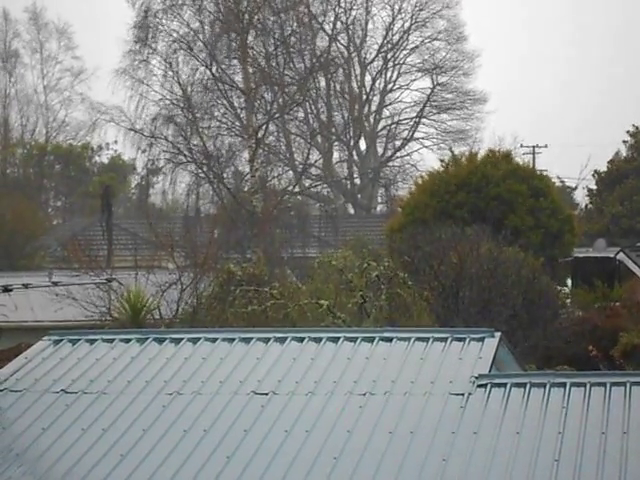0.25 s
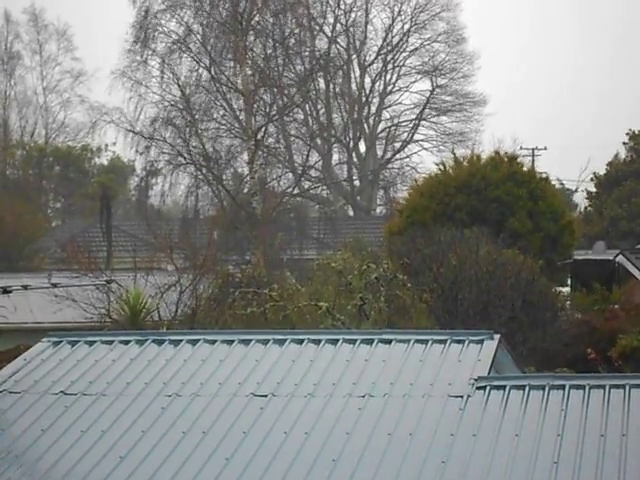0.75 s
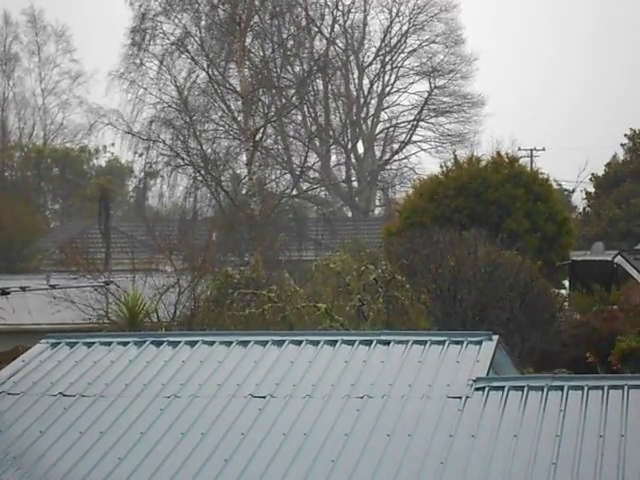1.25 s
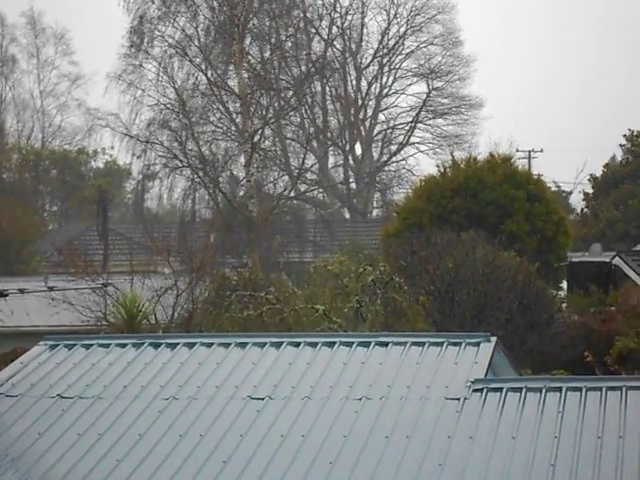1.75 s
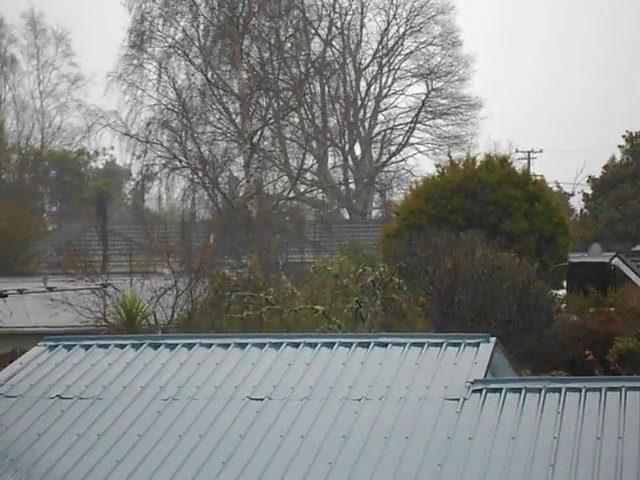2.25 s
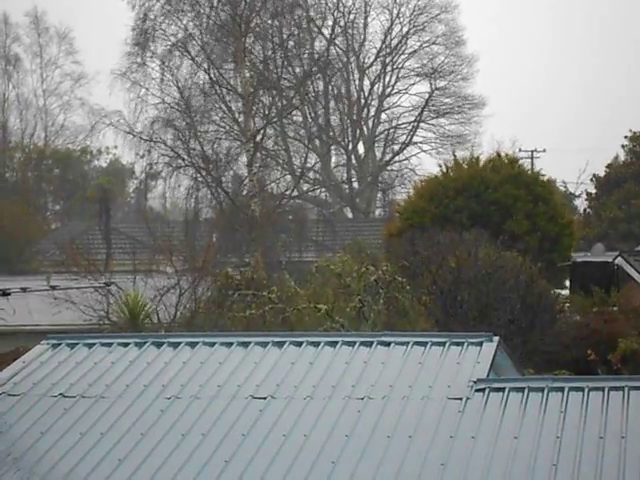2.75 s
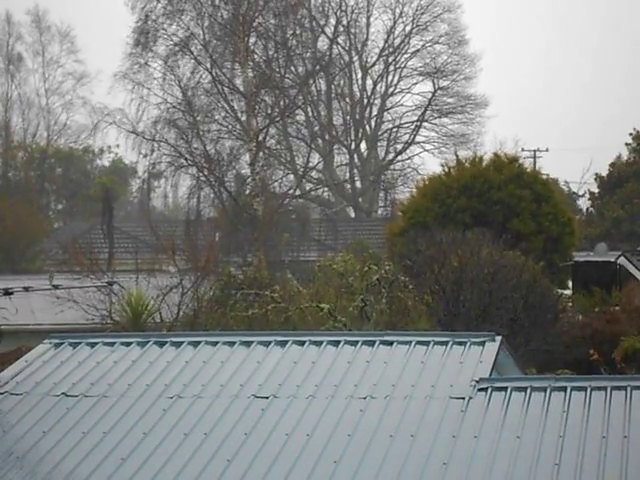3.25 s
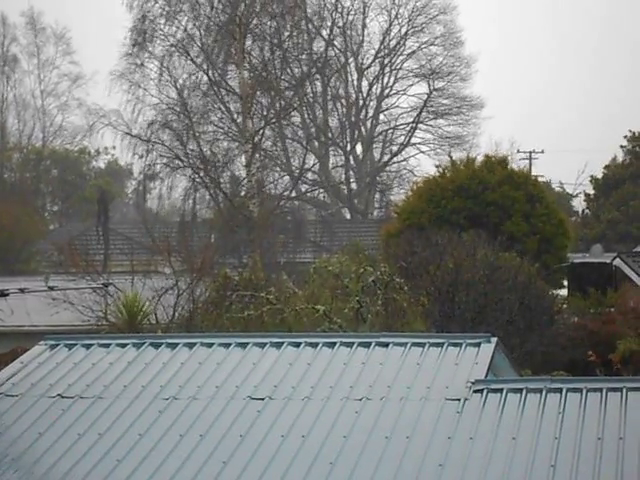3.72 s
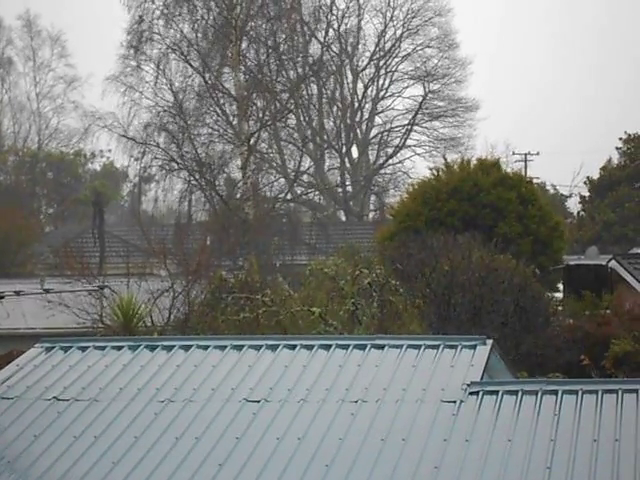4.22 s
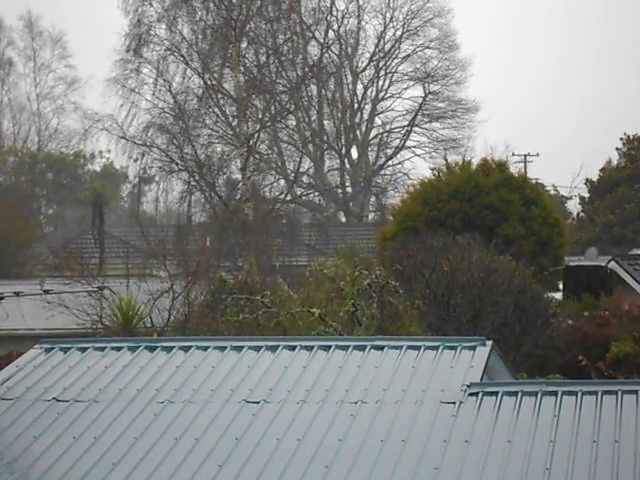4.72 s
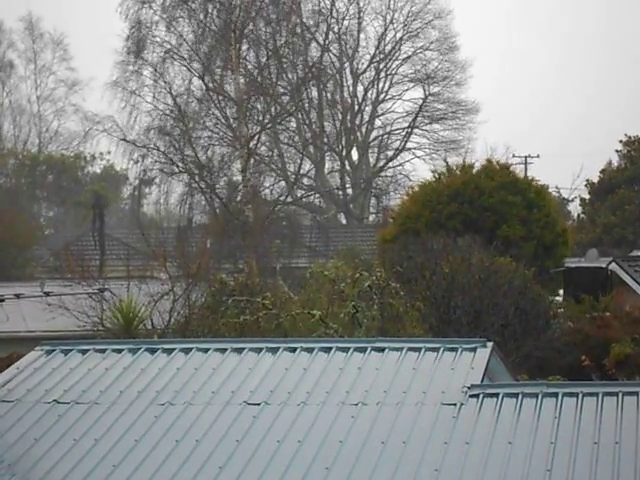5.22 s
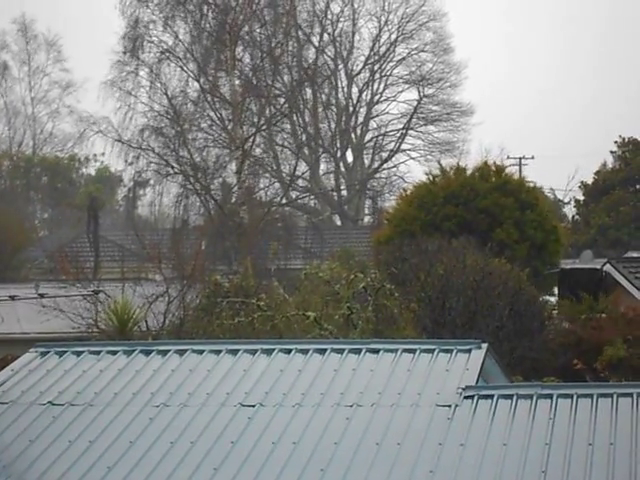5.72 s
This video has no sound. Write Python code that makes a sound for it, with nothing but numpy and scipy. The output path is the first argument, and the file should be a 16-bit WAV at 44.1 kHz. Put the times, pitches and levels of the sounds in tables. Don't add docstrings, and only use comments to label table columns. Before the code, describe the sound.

Heavy rain on corrugated metal roofs makes a continuous boomy roar under a dense bright hiss, swelling and easing slightly. Wind gusts rumble low and thump the microphone, strongest before one second, around 1.6, and from 2.5 to 3.1 seconds. Sparse nearby drops tick sharply, the loudest near 4.7. Heard from an open window through a small camera microphone whose volume dips after loud peaks.

```python
import sys
import numpy as np
from scipy import signal
from scipy.fft import rfft, irfft, next_fast_len
from scipy.io import wavfile
from scipy.ndimage import uniform_filter1d, map_coordinates

SR = 44100
rng = np.random.default_rng(int(sys.argv[2]) if len(sys.argv) > 2 else 0)


def to_wav(sig):
    pcm = np.clip(np.atleast_2d(sig), -1, 1) * 32767
    pcm = np.round(pcm).astype(np.int16)
    wavfile.write(sys.argv[1], SR, pcm.T)


def voltage_ratio(level):
    return 10 ** (np.asarray(level, float) / 20)


N = 263314


def unit(x):
    return x / np.sqrt(np.mean(x ** 2) + 1e-20)


def wobble(rate):
    values = rng.standard_normal(int(N * rate / SR) + 4)
    return map_coordinates(values, [np.arange(N) * rate / SR])


def coloured(x, points):
    padded = next_fast_len(N + 8192)
    hz, db = np.transpose(points)
    bins_hz = np.fft.rfftfreq(padded, 1 / SR)
    gain_db = np.interp(np.log(bins_hz + 1), np.log(hz), db)
    return irfft(rfft(x, padded) * voltage_ratio(gain_db), padded)[..., :N]


def drops(colour, per_second, spread_db, far_db, patchy_db):
    when, size, push = rng.random(N), rng.exponential(size=N), rng.standard_normal(N)
    near = (when < per_second / SR) * voltage_ratio(spread_db * np.minimum(size, 4)) * push
    far = voltage_ratio(far_db) * rng.standard_normal(N)
    spectrum = signal.stft(unit(near) + far, nperseg=512)[2]
    patches = uniform_filter1d(rng.standard_normal(spectrum.shape), size=8, axis=0)
    patches = uniform_filter1d(patches, size=10, axis=1)
    patchy = signal.istft(spectrum * voltage_ratio(patchy_db * unit(patches)), nperseg=512)[1][:N]
    return unit(coloured(patchy, colour))


# (time [s], level [dB])
DOWNPOUR = [
    (0, -23),
    (.55, -21.5),
    (1.3, -23.5),
    (2.3, -21.5),
    (2.8, -24),
    (3.5, -22.5),
    (4.0, -24),
    (4.55, -23),
    (5.15, -21.5),
    (5.97, -23),
]
# (frequency [Hz], level [dB])
SHEET_COLOUR = [(60, -28), (110, -11.5), (220, -6.5), (320, -6.5), (460, -7), (630, -1), (850, -1.5),
                (1050, -2.5), (1400, -7), (1700, -18), (2400, -46)]
# (frequency [Hz], level [dB])
HISS_COLOUR = [(900, -25), (1500, -6), (2050, -0.5), (3000, -2.5), (4500, -5.5), (5600, -7), (6100, -6.5),
               (7000, -16), (8500, -19)]
# (frequency [Hz], level [dB])
SPRAY_COLOUR = [(4500, -33), (6200, -5.5), (7000, 1), (9500, -1), (12000, -1.5), (20000, -11.5)]


def rain():
    strength_db = np.interp(np.arange(N) / SR, *np.transpose(DOWNPOUR))
    surge_db = 0.12 * wobble(9) + 0.2 * wobble(30)
    boom = voltage_ratio(4.6) * drops(SHEET_COLOUR, per_second=3000, spread_db=2.5, far_db=9, patchy_db=0.25)
    hiss = voltage_ratio(0.88) * drops(HISS_COLOUR, per_second=2500, spread_db=5.5, far_db=11, patchy_db=0.37)
    spray = voltage_ratio(-3.5) * drops(SPRAY_COLOUR, per_second=990, spread_db=3, far_db=6.0, patchy_db=0.4)
    return voltage_ratio(strength_db - 2.0 + surge_db) * (boom + hiss + spray)


# (time [s], level [dB], rise time [s])
GUSTS = [(0.05, -19, .6), (0.757, -15.5, 0.069), (0.882, -10, 0.04), (1.05, -20, .1), (1.14, -20.5, .25),
         (1.27, -17, .12), (1.66, -20, 0.42), (1.78, -23, .06), (1.86, -19, .08), (2.002, -26, .1),
         (2.62, -18.5, 0.41), (2.84, -21, .3), (3.11, -13, 0.19), (3.87, -23, .15), (3.978, -27, .06),
         (4.268, -25, 0.032), (4.442, -33, 0.081), (5.15, -28, .35), (5.62, -25, .12), (5.85, -24, .12),
         (5.95, -25, .15)]
# (frequency [Hz], level [dB])
RUMBLE_COLOUR = [(10, -34), (25, 1), (60, -7), (120, -13.5), (250, -18), (500, -48.5)]


def buffeting():
    calm_db, swell_db = -36, 18.5
    fall_per_rise = 0.45
    t = np.arange(N) / SR
    strength = voltage_ratio(calm_db)
    for crest_s, db, rise_s in GUSTS:
        distance = np.maximum(crest_s - t, (t - crest_s) / fall_per_rise) / rise_s
        strength = strength + voltage_ratio(db - swell_db * distance)
    rumble = coloured(rng.standard_normal(N), RUMBLE_COLOUR)
    return voltage_ratio(-4.5) * strength * unit(voltage_ratio(2.2 * wobble(25)) * rumble)


# (time [s], level [dB], width [ms])
PUFFS = [(0.04, -9.5, 4.8), (0.752, -4.5, 2.9), (0.881, -13, 3.7), (0.905, -7, 4), (1.05, -5.5, 3.9),
         (1.126, -8, 2.4), (1.147, -10, 3.1), (1.262, -13, 5), (1.556, -16, 13), (1.605, -11, 3.5),
         (1.622, -7, 1.4), (1.644, -9, 3.3), (1.657, -7.5, 4.4), (1.664, -5.5, 2.9), (2.533, -8, 2.4),
         (2.597, -6, 3), (2.653, -9, 2.6), (2.756, -12, 7.8), (2.781, -10.5, 2.4), (2.843, -10, 17),
         (3.003, -13, 3.3), (3.038, -16, 2.9), (3.057, -5.5, 4.5), (3.091, -7, 4.3), (3.104, -12, 1.4),
         (3.117, -2.5, 2.7), (3.842, -16, 6), (5.597, -14, 1.5), (5.683, -15, 5), (5.95, -14, 4.3)]


def wind_thumps():
    t = np.arange(N) / SR
    out = np.zeros(N)
    for s, db, width_ms in PUFFS:
        span = slice(round((s - .04) * SR), round((s + .08) * SR))
        u = (t[span] - s) / (width_ms * 0.0005)
        bump = np.exp(-np.abs(u) ** 1.34)
        rebound = 0.58 * np.exp(-((u - 2.6) / 1.9) ** 2)
        early_dip = 0.15 * np.exp(-((u + 2.0) / 1.14) ** 2)
        out[span] += voltage_ratio(db - 1.0) * (bump - rebound - early_dip)
    return out


# (time [s], level [dB])
TICKS = [(0.1779, -18), (1.039, -29), (1.2595, -22), (1.3454, -18), (1.3488, -13.5), (1.5178, -18),
         (3.487, -19), (3.5842, -17), (3.6715, -20), (4.2028, -19), (4.228, -16), (4.683, -9.5),
         (4.8131, -16), (5.0466, -40), (5.4322, -16), (5.4759, -17), (5.5937, -19), (5.9495, -21)]


def ticks():
    peak_s = .00008
    out, t = np.zeros(N + 2000), np.arange(1500) / SR
    for s, db in TICKS:
        hz = 9600 - 110 * (db + 8)
        hz *= 1 + .02 * rng.standard_normal()
        ping = np.sin(2 * np.pi * hz * t) * (t / peak_s) * np.exp(1 - t / peak_s)
        bright_noise = np.diff(rng.standard_normal(len(t) + 2), n=2) / 2
        splash = voltage_ratio(-12.5 - 60 * t / 0.074) * bright_noise
        start = round((s - .00015) * SR)
        out[start:start + len(t)] += voltage_ratio(db + 10.0) * (ping + splash)
    lag = round(.0042 * SR)
    first_echo = voltage_ratio(-19) * np.roll(out, lag)
    second_echo = voltage_ratio(-16) * np.roll(out, 2 * lag)
    return (out + first_echo + second_echo)[:N]


def scene():
    return (rain() + buffeting() + wind_thumps() + ticks())[None]


# (frequency [Hz], level [dB])
MICROPHONE_COLOUR = [(5, -20), (22, 1), (10150, 0.5), (10500, -4), (11000, -15.5), (11600, -15.5),
                     (11900, -20), (12300, -40), (14000, -70)]


def microphone(sound):
    return coloured(sound, MICROPHONE_COLOUR)


# (time [s], depth [dB])
DUCKS = [(-0.1, 5), (0.754, 4), (1.05, 0.6), (1.27, 0.5), (1.66, 3), (2.53, 3), (2.68, -0.5), (2.8, 0.5),
         (3.06, 2.5), (3.118, 2.5), (3.85, -1), (4.683, 6)]


def gain_control():
    grip_s, hold_s, creep_s = 0.0081, .16, 0.35
    t = np.arange(N) / SR
    cut_db = np.zeros(N)
    for s, depth_db in DUCKS:
        since = np.maximum(t - s, 0)
        fall = 1 - np.exp(-since / grip_s)
        creep_back = np.exp(-np.maximum(since - hold_s, 0) / creep_s)
        cut_db += depth_db * fall * creep_back
    return voltage_ratio(-cut_db)


def overload(x):
    return x / (1 + np.abs(x / .72) ** 6) ** (1 / 6)


def top_cut(x):
    return signal.sosfilt(signal.butter(12, 12060, fs=SR, output="sos"), x)


def record(dry):
    mix = overload(microphone(dry) * gain_control())
    return top_cut(mix)


dry = scene()
out = record(dry)
to_wav(out)
```